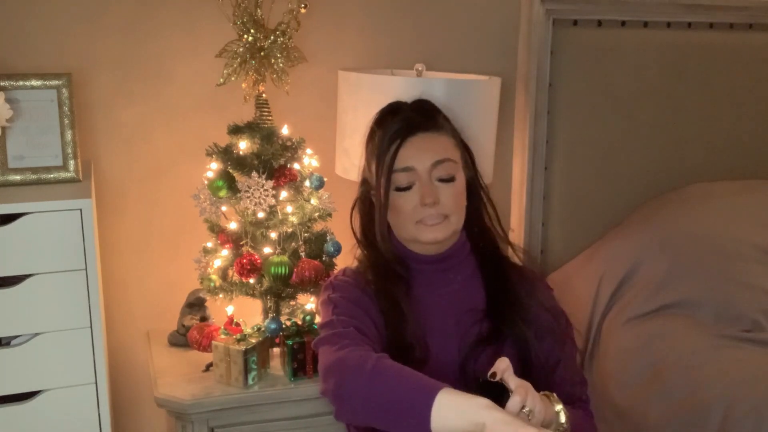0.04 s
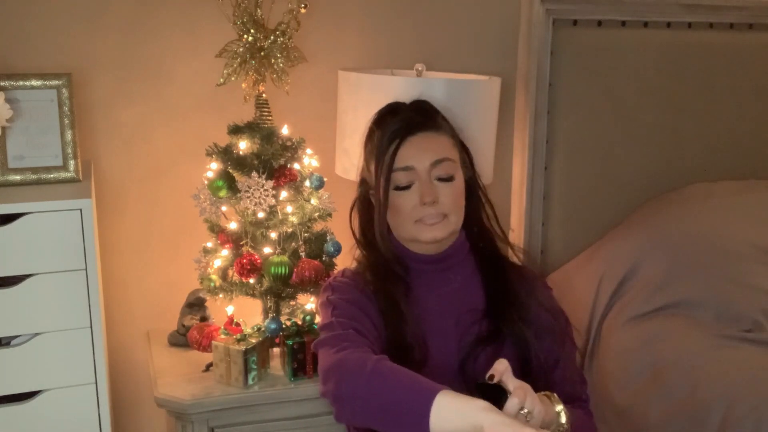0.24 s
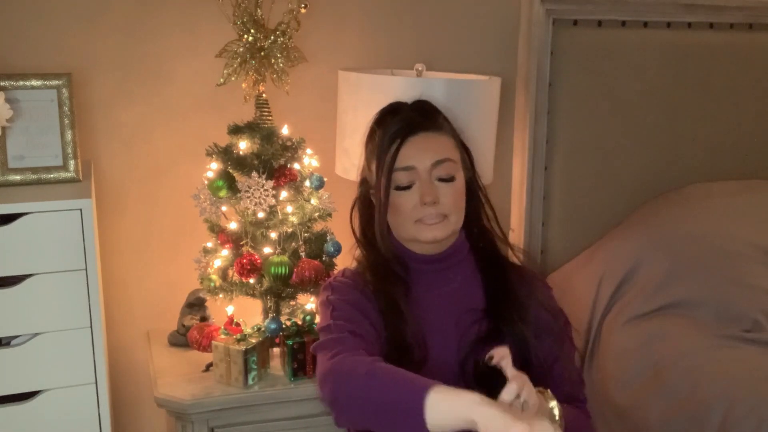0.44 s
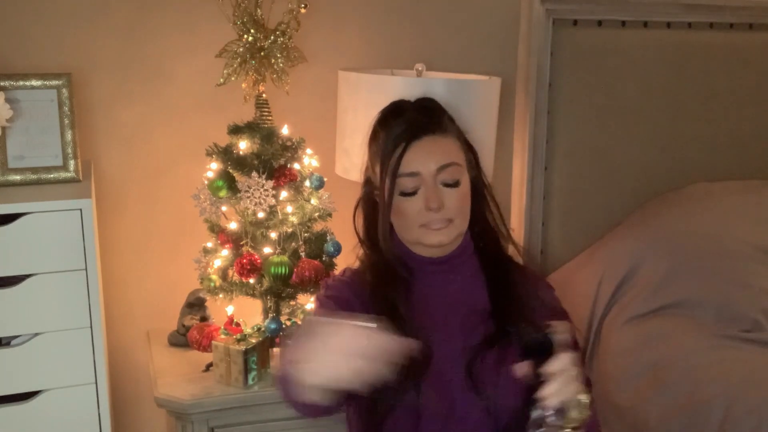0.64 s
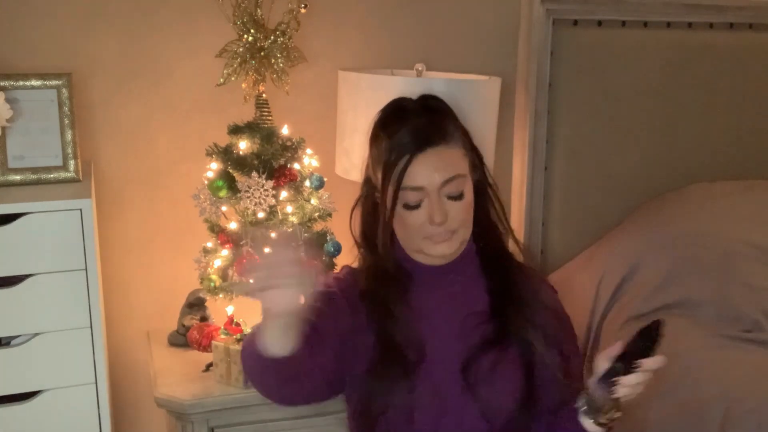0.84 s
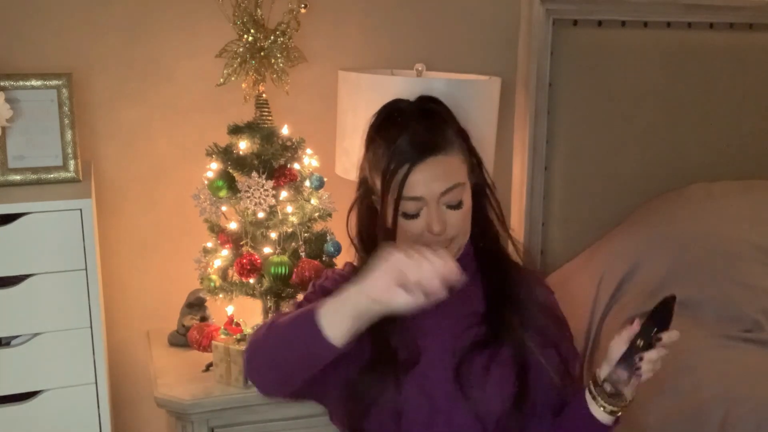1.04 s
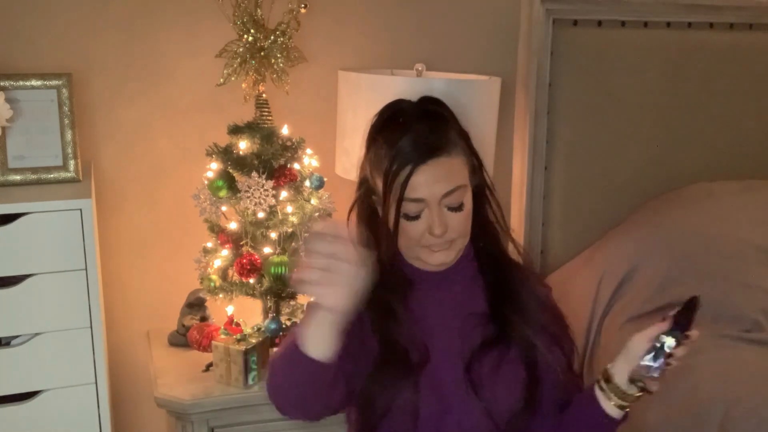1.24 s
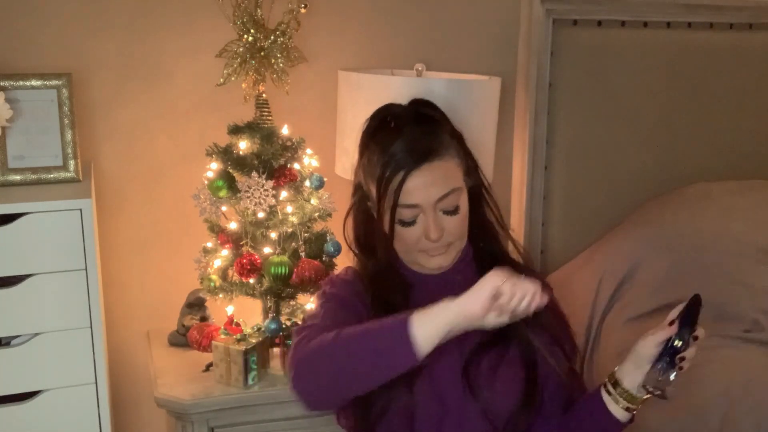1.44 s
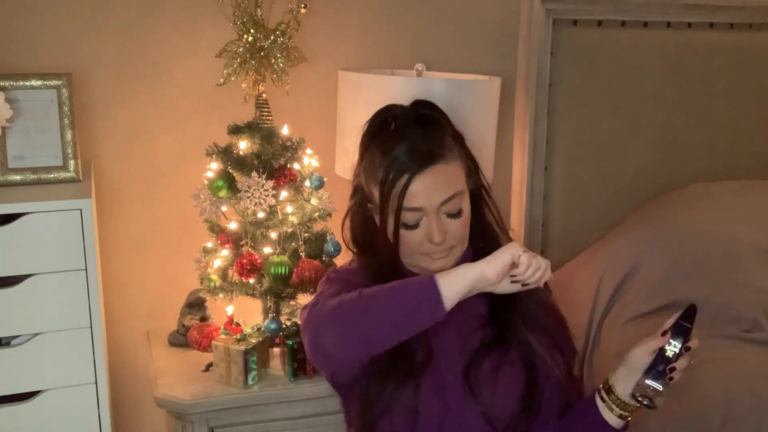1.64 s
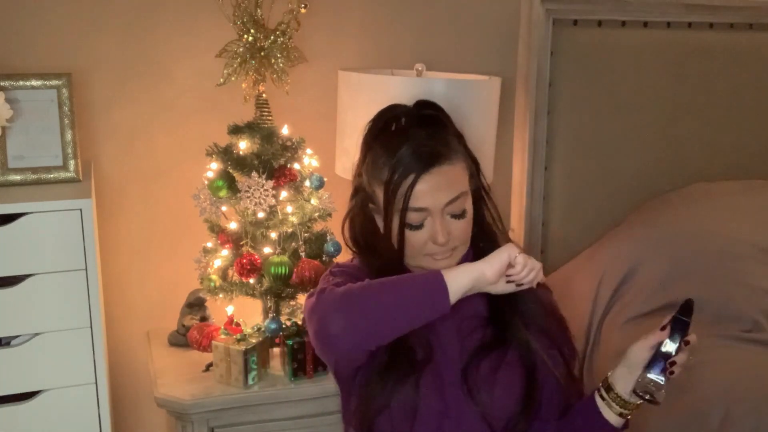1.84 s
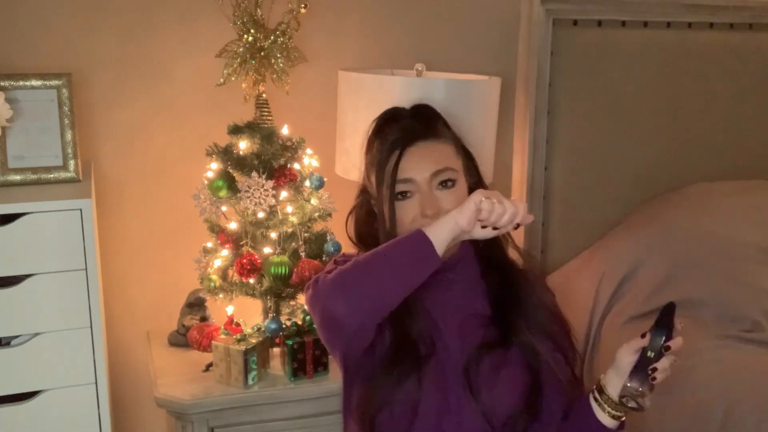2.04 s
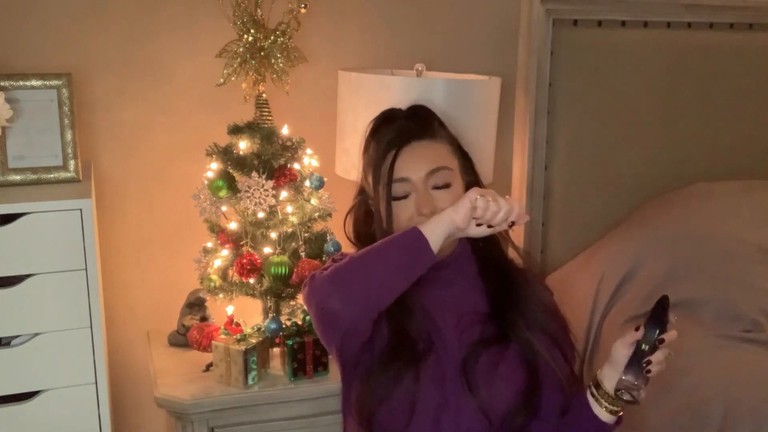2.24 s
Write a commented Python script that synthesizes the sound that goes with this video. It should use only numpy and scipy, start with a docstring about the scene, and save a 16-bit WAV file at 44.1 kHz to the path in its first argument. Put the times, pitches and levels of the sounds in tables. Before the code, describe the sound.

One very brief perfume spray opens, then the glass bottle clinks loudly; after a quiet gap come a soft pat and light clicks of nails or bracelets, with short room reflections and faint low hum.

```python
"""In a small bedroom a perfume atomizer sprays once: a thin noise hiss, then a fuller jet as the pump bottoms.
The glass bottle clinks as it is taken up: noise strikes and cracks over decaying sine modes.
A hand gives a dull pat and the pump, nails and bracelets tick, all as short coloured noise bursts.
Dense decaying reflections answer these sounds, over a low rumble, a mains hum and faint hiss."""
import sys
import numpy as np
from scipy import signal
from scipy.fft import rfft, irfft
from scipy.io import wavfile
from scipy.ndimage import uniform_filter1d

SR = 44100
rng = np.random.default_rng(int(sys.argv[2]) if len(sys.argv) > 2 else 0)


def wrap_up_sound(samples):
    """Save the sound to the file named by the first command line argument, as 16-bit audio."""
    columns = np.atleast_2d(samples).T
    # keep every value between -1 and 1, then stretch to whole-number steps
    tamed = np.clip(columns, -1, 1)
    steps = np.round(tamed * 32767).astype(np.int16)
    wavfile.write(sys.argv[1], SR, steps)


N = 101826  # length in samples

DIRECT_SAME = 0.31  # left-right coherence of the spray and ticks before the room


def amp(db):
    """Decibels to gain."""
    return 10 ** (np.asarray(db) / 20)


def evened(x):
    """Scales to rms 1."""
    return x / np.sqrt(np.mean(x ** 2) + 1e-20)


def read(points, hz):
    """Reads a table on a log-frequency axis."""
    f, value = np.transpose(points)
    return np.interp(np.log(hz + 1), np.log(f + 1), value)


def since(start):
    """Seconds since start, zero before it."""
    return np.maximum(np.arange(N) / SR - start, 0)


def bins():
    """Frequencies of the whole-length spectrum."""
    return np.fft.rfftfreq(N, 1 / SR)


def coloured(x, db):
    """Filters by a gain in dB for each frequency."""
    return irfft(rfft(x) * amp(db), N)


def resonances(peaks):
    """Lift in dB from a table of resonances."""
    return sum(db / (1 + (2 * (bins() - hz) / width) ** 2) for hz, width, db in peaks)


def noise(colour_db, same):
    """Stereo noise of rms 1 with a given colour and left-right coherence."""
    a, b = rfft(rng.standard_normal((2, N)))
    c = np.clip(same, -1, 1)
    right = c * a + np.sqrt(1 - c ** 2) * b
    return evened(irfft(np.array([a, right]) * amp(colour_db), N))


def burst(start, decay, rise=0.00059):
    """Envelope of a contact: sharp rise, exponential fall."""
    t = since(start)
    return (1 - np.exp(-t / rise)) * np.exp(-t / decay)


def flow(start, attack, hold, release, db):
    """Envelope of one phase of the spray: square-root rise, hold, exponential fall."""
    rise = np.sqrt(np.minimum(since(start) / attack, 1))
    return amp(db) * rise * np.exp(-since(start + attack + hold) / release)


def in_room(x, wet_db):
    """Adds dense reflections as decaying noise, the treble dying first."""
    # Reverberation time. Each row: frequency in Hz, t60 in seconds.
    room_t60 = [(200, 0.48), (1000, 0.43), (2000, 0.46), (4500, 0.41), (8000, 0.29), (14000, 0.18)]
    gap_s, end_s = 0.00303, 0.23  # pause before the reflections, age where the tail is cut short
    taps = rng.standard_normal((2, 28000))
    hz, t, z = signal.stft(taps, SR, nperseg=256)
    fade = amp(-60 * t / read(room_t60, hz)[:, None])
    tail = signal.istft(z * fade, SR, nperseg=256)[1]
    age = np.arange(tail.shape[1]) / SR
    tail = tail * (age > gap_s) * np.exp(-(age / end_s) ** 3)
    tail = tail / np.linalg.norm(tail, axis=1, keepdims=True)
    return x + amp(wet_db) * signal.fftconvolve(x, tail, axes=1)[:, :N]


def spray():
    """Turbulent noise: fine mist, then a fuller jet with nozzle resonances, both sputtering slightly."""
    # Envelopes of the two phases. Each holds: attack, hold and release in seconds.
    mist_shape = (.018, .058, .02)
    jet_shape = (.012, .058, .021)
    # Their noise colours. Each row: frequency in Hz, relative level in dB.
    mist_colour = [(1500, -37), (4000, -19.5), (6500, -21), (7800, -9.5), (9500, -25), (10800, 3),
                   (12000, 5), (13200, -18), (14500, 6), (15500, 0)]
    jet_colour = [(600, -39), (1100, -15), (1400, -2.5), (2300, 0), (3900, -10.5), (4800, -1), (8000, -3.5),
                  (11000, -12), (15500, -4)]
    # Resonances of the nozzle and cap. Each row: frequency in Hz, width in Hz, lift in dB.
    nozzle = [(1836, 94, 10.5), (4760, 280, 11.5), (6170, 200, 13)]
    mist_start_s, mist_db = .031, -35
    jet_start_s, jet_db = .099, -36.5
    sputter_db, room_db = 0.5, -12
    hz = bins()
    flutter = evened(uniform_filter1d(rng.standard_normal(N), size=60))
    sputter = evened(amp(sputter_db * flutter))
    mist = flow(mist_start_s, *mist_shape, mist_db) * noise(read(mist_colour, hz), DIRECT_SAME)
    jet_tone = read(jet_colour, hz) + resonances(nozzle)
    jet = flow(jet_start_s, *jet_shape, jet_db) * noise(jet_tone, DIRECT_SAME)
    return in_room((mist + jet) * sputter, room_db)


def bottle():
    """A quick chatter of hard contacts excites the glass: a loud short strike, then faint ringing modes."""
    # Contacts of the bottle. Each row: start in seconds, relative level in dB.
    clinks = [(0.3535, 0.5), (0.355, -3.5), (0.3601, 0.5)]
    # Modes of the glass. Each row: frequency in Hz, relative level in dB, t60 in seconds.
    glass = [(1060, -9, 0.61), (1630, -21, 0.16), (1778, -9, 0.14), (2068, -3.5, 0.17), (2154, -7.5, .32),
             (2347, -11.5, 0.3), (3142, -1, 0.43), (3200, -7, 0.39), (3270, -6.5, 0.22), (4110, -4, 0.38),
             (4340, -4, 0.15), (4390, -3.5, 0.48), (4442, -1.5, 0.4), (5260, -16, 0.21), (6375, -11.5, .2),
             (6810, -12, .22), (7360, -10, 0.2)]
    # Colour of the hard crack. Each row: frequency in Hz, relative level in dB.
    crack_colour = [(500, -40), (850, -33), (1100, 0.5), (2200, 0.5), (2700, -28), (3600, -2.5), (7000, -4),
                    (11000, -1), (15500, -10.5)]
    # Likeness between left and right. Each row: frequency in Hz, coherence.
    clink_same = [(1000, 0.5), (2000, 0.3), (3200, 0.042), (4300, -0.79), (6000, -0.063), (14000, .2)]
    # Direct sound at the microphone, apart from the room. Each row: frequency in Hz, gain in dB.
    clink_direct = [(1000, -0.5), (2100, -0.5), (3200, 1), (4300, -5), (5500, 1.5), (14000, -0.5)]
    ring_db, strike_db, crack_db, room_db = -34, -18, -19.5, -1.5
    strike_s, crack_s = 0.027, 0.0041  # strike_s sets mode width and decay; crack_s is the decay
    hz = bins()
    first = clinks[0][0]
    t = since(first)

    ring = np.zeros((2, N))
    for pitch, db, t60 in glass:
        phase = rng.uniform(0, 2 * np.pi, (2, 1))
        envelope = amp(ring_db + db) * burst(first, t60 / np.log(1000), rise=0.0059)
        ring += envelope * np.sin(2 * np.pi * pitch * t + phase)

    # The strike is noise gathered around the glass modes; contacts add in power
    width = np.log(1000) / np.pi / strike_s
    body = sum(amp(db) ** 2 / (1 + (2 * (hz - pitch) / width) ** 2) ** 2 for pitch, db, _ in glass)
    strike = np.sqrt(sum((amp(db) * burst(s, strike_s / 3)) ** 2 for s, db in clinks))
    crack = np.sqrt(sum((amp(db) * burst(s, crack_s)) ** 2 for s, db in clinks))
    same = read(clink_same, hz)
    hit = amp(strike_db) * strike * noise(10 * np.log10(body), same)
    hit = hit + amp(crack_db) * crack * noise(read(crack_colour, hz), same)
    reflections = in_room(hit, room_db) - hit
    return ring + coloured(hit, read(clink_direct, hz)) + reflections


def pat():
    """A soft hand lands in a few quick touches: dull noise bursts with slightly hollow resonances."""
    # Touches of the hand. Each row: start in seconds, level in dB.
    pats = [(1.4122, -27), (1.4192, -23), (1.4257, -28)]
    # Colour of the thud. Each row: frequency in Hz, relative level in dB.
    pat_colour = [(90, -8), (220, -4.5), (480, -5.5), (800, -6.5), (1200, -6), (1900, -16), (2700, -33),
                  (5000, -43), (9000, -51)]
    # Resonances that the pat stirs. Each row: frequency in Hz, width in Hz, lift in dB.
    pat_peaks = [(428, 66, 6), (596, 41, 10.5), (702, 36, 8.5), (905, 110, 4.5), (1270, 120, 2),
                 (1580, 150, 4.5)]
    decay_s, room_db = 0.0073, -3.5
    touch = sum(amp(db) * burst(s, decay_s, rise=0.001) for s, db in pats)
    thud = touch * noise(read(pat_colour, bins()), 0.68)
    rings = 0
    for hz, width, db in pat_peaks:
        b, a = signal.iirpeak(hz, hz / width, SR)
        rings = rings + (amp(db) - 1) * signal.lfilter(b, a, thud)
    return in_room(thud + rings, room_db)


def ticks():
    """Each click is a brief broadband snap with one main resonance."""
    # Clicks of the pump, nails and bracelets. Each row: start in seconds, level in dB, main pitch
    # in Hz, width in octaves, broadband share in dB, decay in seconds, length in seconds, room in dB.
    clicks = [(0.107, -33, 1810, .12, -25, 0.022, 0.02, -12),
              (0.683, -53.5, 1660, 0.37, -5, 0.0084, .03, -1.5), (.727, -52, 1540, 0.28, -8, .014, .03, -5),
              (.728, -49, 11000, 0.31, -16, 0.0064, .03, -4),
              (1.413, -31, 6860, 0.16, -12, 0.0051, .03, -5),
              (1.7657, -48.5, 2150, 0.17, -23, 0.0096, .03, -4),
              (1.766, -50, 4160, .3, -12, 0.0072, 0.025, -0.5),
              (1.811, -36, 7370, 0.12, -11, 0.0039, .03, -4),
              (1.8114, -40.5, 11100, 0.092, -16, .003, .03, -6),
              (1.9513, -38.5, 1910, 0.22, -23, 0.031, 0.047, -39),
              (1.952, -43.5, 3100, .05, -11, 0.0069, .04, -14),
              (1.949, -47.5, 4550, 0.087, -16, 0.01, .04, -9)]
    hz = bins() + 1  # keeps the logarithm finite
    out = np.zeros((2, N))
    for s, db, pitch, width, broad_db, decay, length, room_db in clicks:
        resonance = np.exp(-.5 * (np.log2(hz / pitch) / width) ** 2)
        snap = amp(broad_db) / (1 + (900 / hz) ** 4) / (1 + (hz / pitch / 2) ** 2)
        colour_db = 20 * np.log10(resonance + snap + 1e-6)
        envelope = amp(db) * burst(s, decay) * np.exp(-since(s + length) / .002)
        out += in_room(envelope * noise(colour_db, DIRECT_SAME), room_db)
    return out


def background():
    """Noise bed whose lows wander in level, sine swells in the rumble, a mains hum and faint hiss."""
    # Colour of the noise bed. Each row: frequency in Hz, relative level in dB.
    floor_colour = [(15, -43), (25, -22.5), (40, -2.5), (60, -3.5), (120, -3.5), (165, -5.5), (217, -13.5),
                    (280, -18), (380, -18), (590, -27), (760, -32), (1440, -37), (3000, -41.5),
                    (5700, -45.5), (7700, -41), (9500, -51.5), (11500, -40), (15500, -49)]
    # Likeness between left and right. Each row: frequency in Hz, coherence.
    floor_same = [(50, 0.77), (150, 0.95), (350, 0.59), (800, 0.36), (2000, 0.058), (15000, 0.091)]
    # Swells of the rumble. Each row: centre in seconds, length in seconds, frequency in Hz, level in dB.
    swells = [(0.051, 0.083, 77, -39), (0.307, 0.17, 88, -33), (0.483, 0.15, 69, -33),
              (1.051, 0.061, 95, -36), (1.525, 0.081, 122, -32), (2.045, 0.069, 150, -41),
              (2.226, 0.051, 88, -32.5)]
    floor_db = -39.5
    hum_hz, hum_db = 120.1, -48.5
    wander_db, wander_s, wander_below_hz = 2., 0.082, 640  # depth, time scale, upper limit
    t, hz = since(0), bins()
    low = amp(hum_db) * np.sin(2 * np.pi * (hum_hz * t + rng.random()))
    for centre, length, pitch, db in swells:
        swell = amp(db) * np.cos(np.pi * np.clip((t - centre) / length, -.5, .5))
        low = low + swell * np.sin(2 * np.pi * (pitch * t + rng.random()))
    bed = amp(floor_db) * noise(read(floor_colour, hz), read(floor_same, hz))
    rumble = coloured(bed, -20 * np.log10(1 + (hz / wander_below_hz) ** 4))
    slow = rfft(rng.standard_normal(N)) / (1 + (hz * wander_s) ** 6)
    wander = evened(irfft(slow, N))
    return low + bed + rumble * (evened(amp(wander_db * wander)) - 1)


def scene():
    """All sources, leaning slightly to the right at most pitches."""
    # Stereo balance. Each row: frequency in Hz, left minus right in dB.
    balance = [(60, -2.8), (250, 0.5), (600, -0.1), (1500, -2), (3200, -1.5), (4300, -0.7), (7000, -0.5),
               (11000, -0.5)]
    lean = read(balance, bins()) / 2
    mix = spray() + bottle() + pat() + ticks() + background()
    return coloured(mix, np.array([lean, -lean]))


def record(dry):
    """The recorder's band limit: a steep low-pass."""
    edge_hz = 15850
    lowpass = signal.firwin(511, edge_hz, window=("kaiser", 9), fs=SR)
    return signal.oaconvolve(dry, lowpass[None], "same")


dry = scene()
out = record(dry)
wrap_up_sound(out)
```